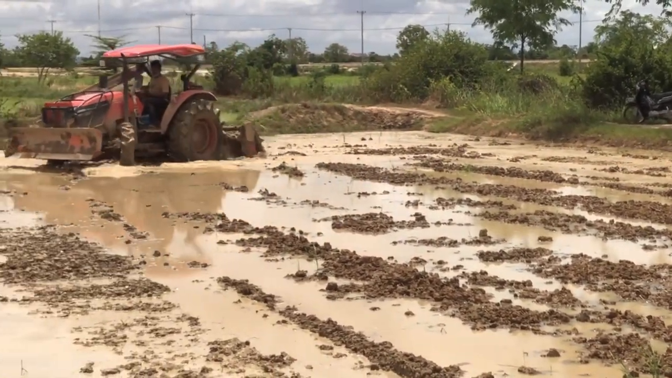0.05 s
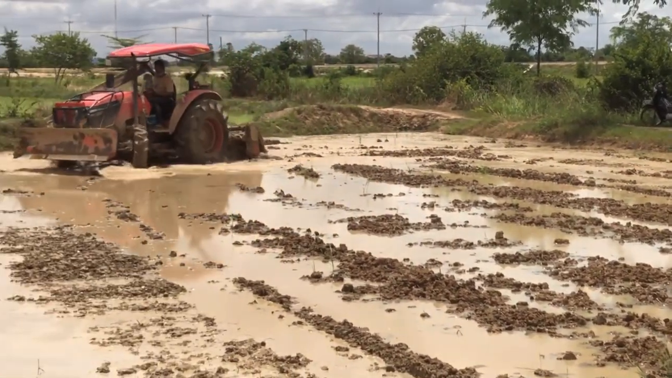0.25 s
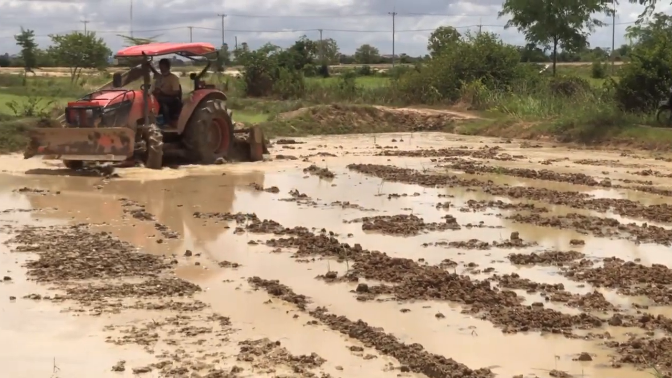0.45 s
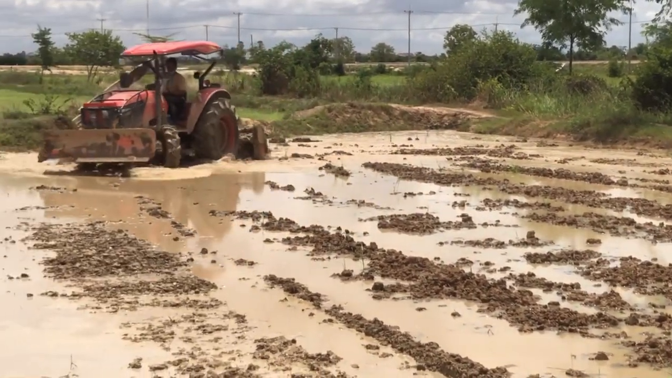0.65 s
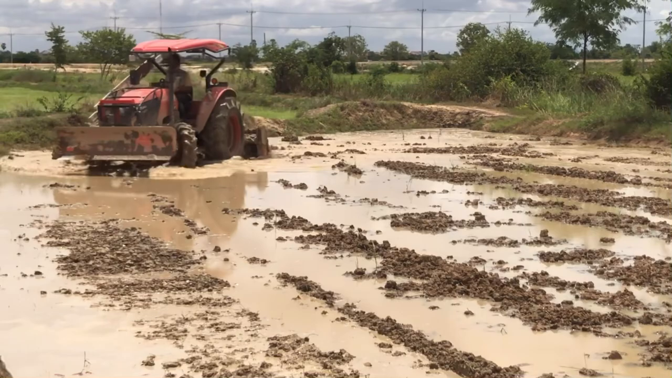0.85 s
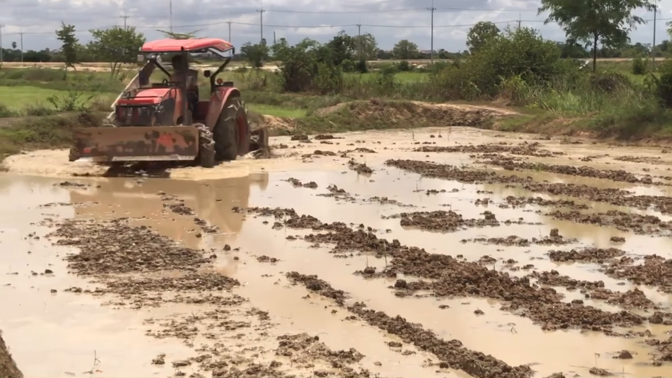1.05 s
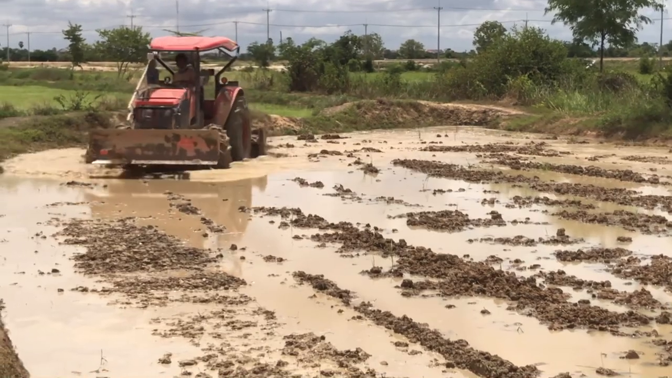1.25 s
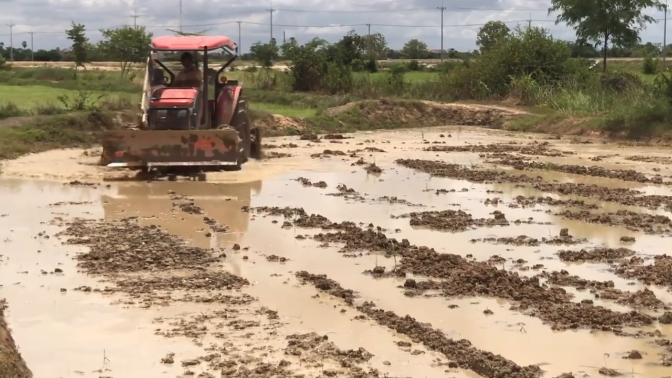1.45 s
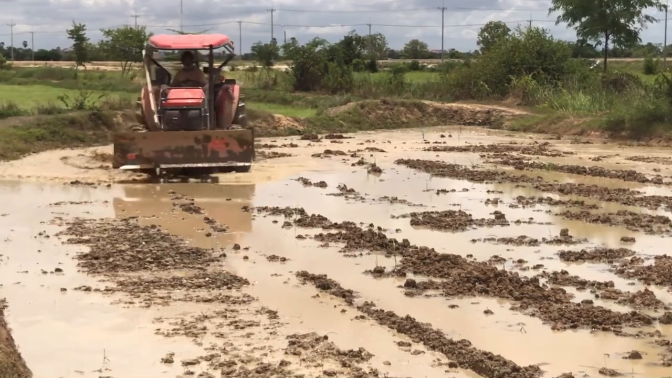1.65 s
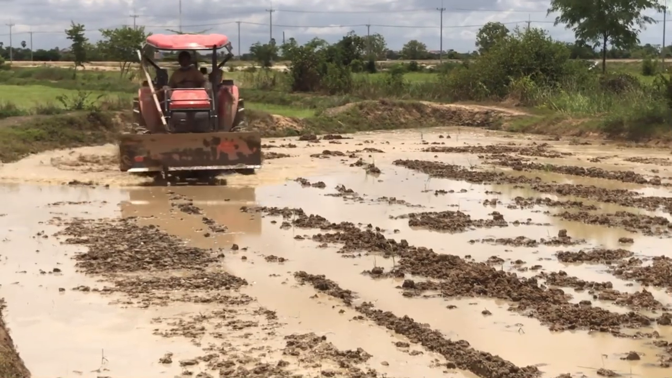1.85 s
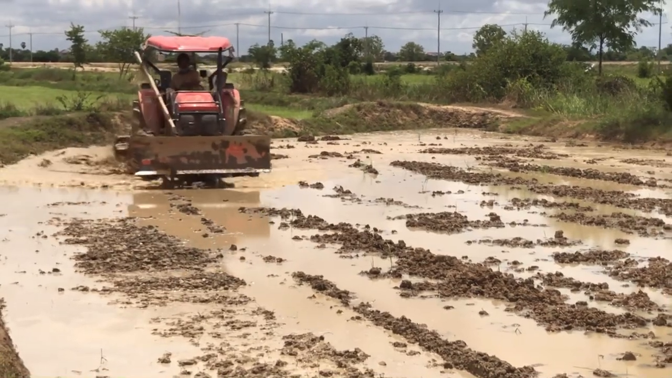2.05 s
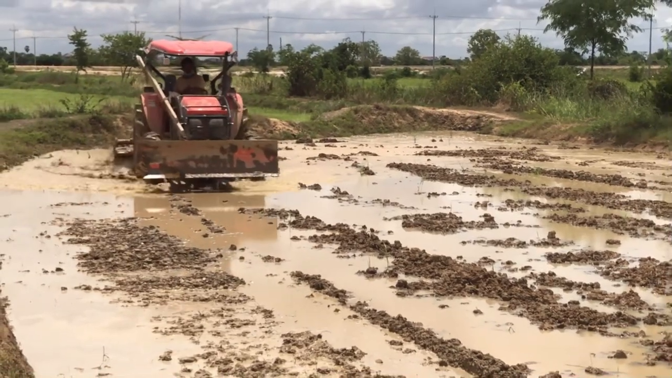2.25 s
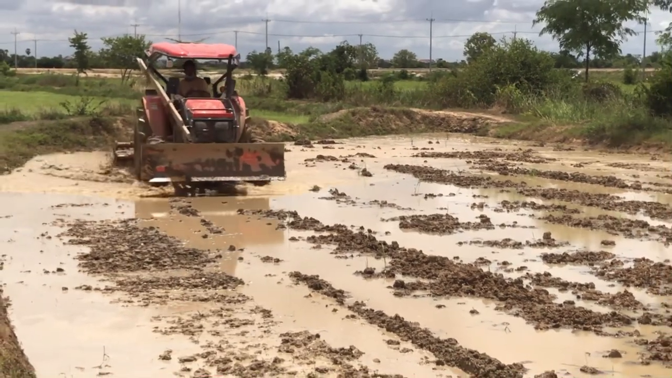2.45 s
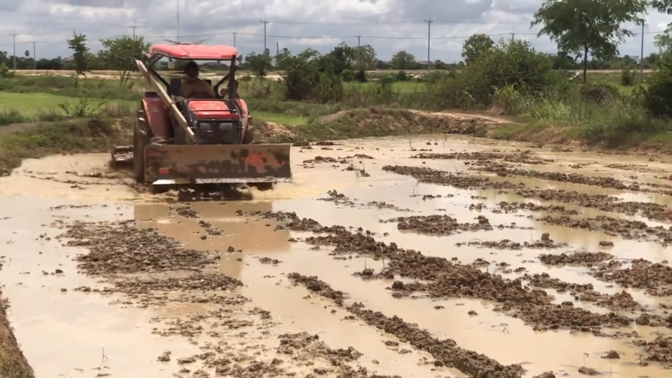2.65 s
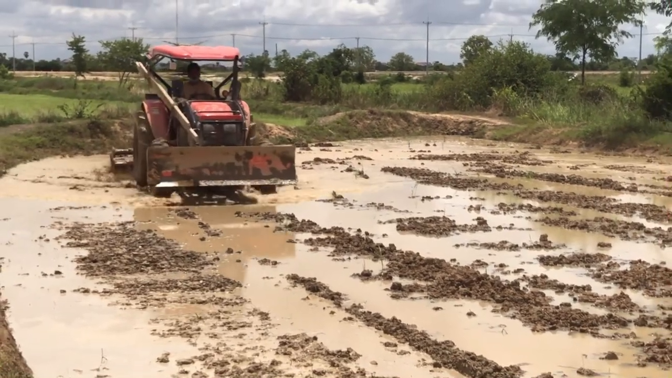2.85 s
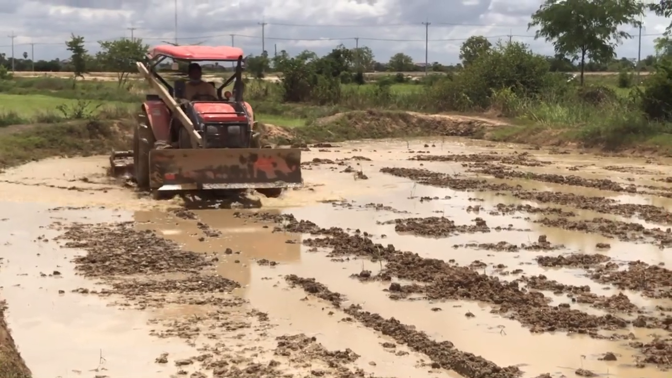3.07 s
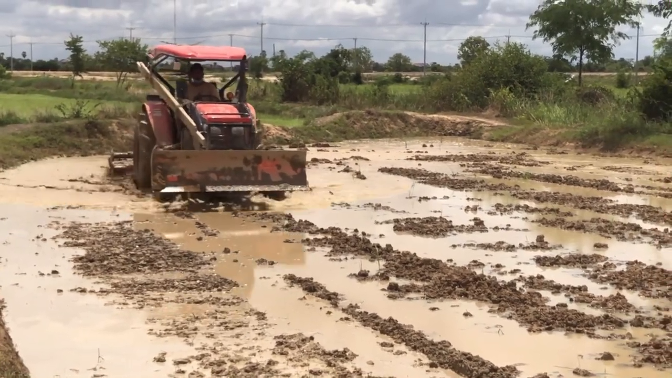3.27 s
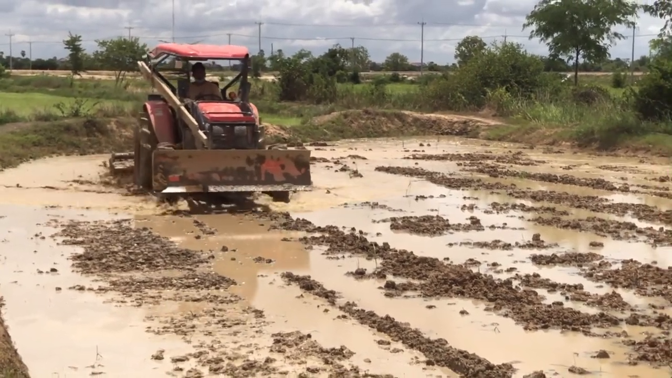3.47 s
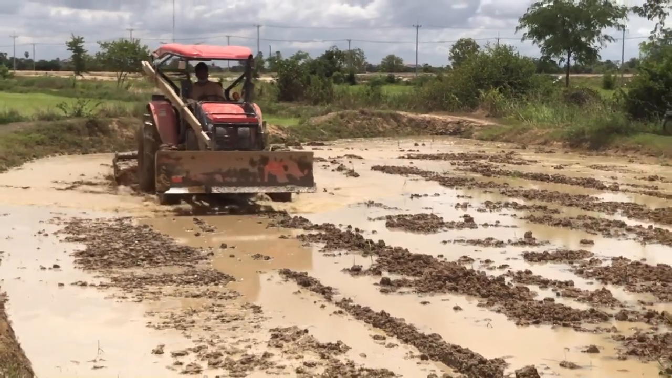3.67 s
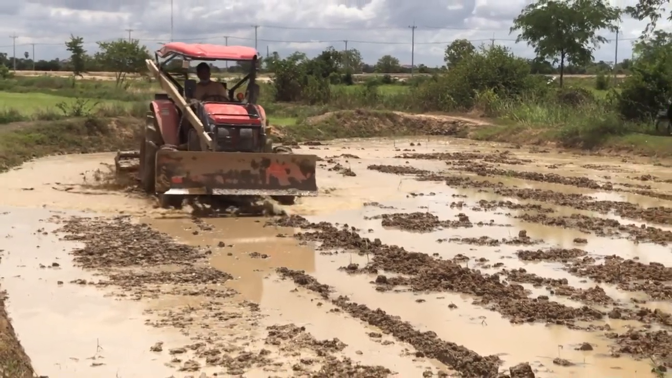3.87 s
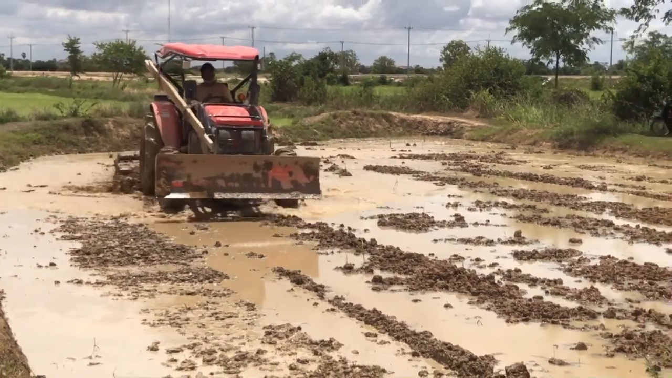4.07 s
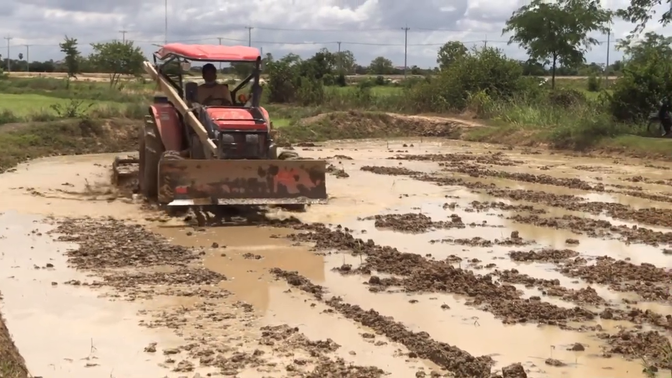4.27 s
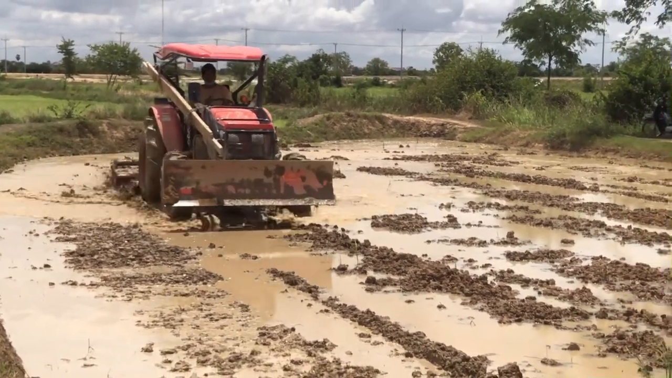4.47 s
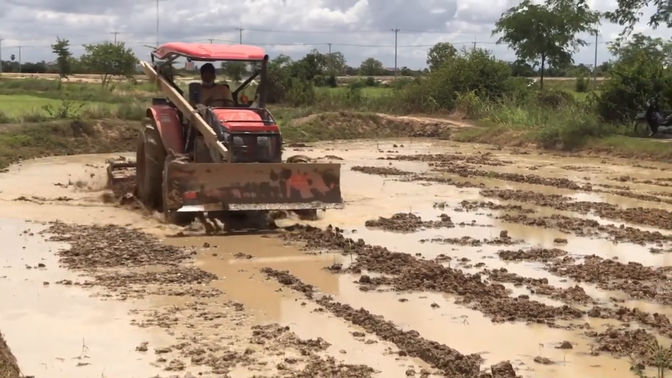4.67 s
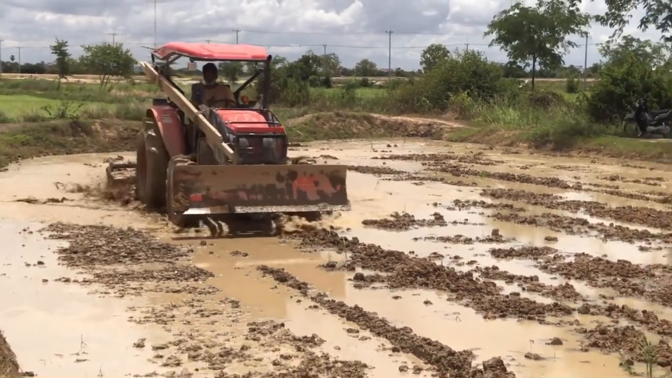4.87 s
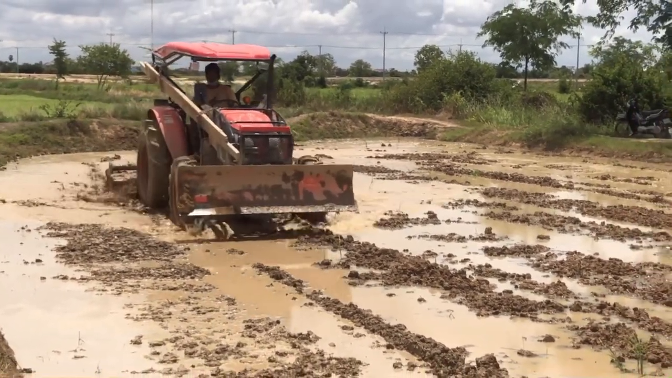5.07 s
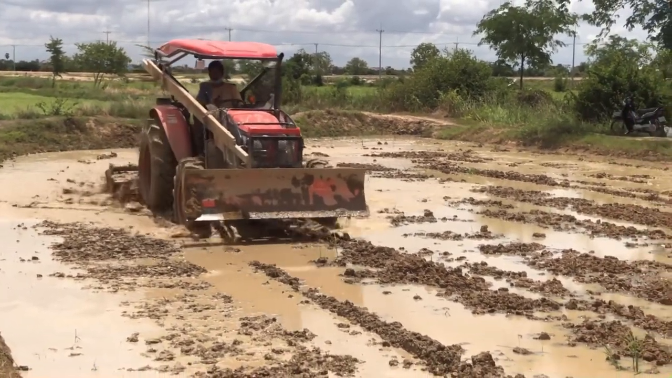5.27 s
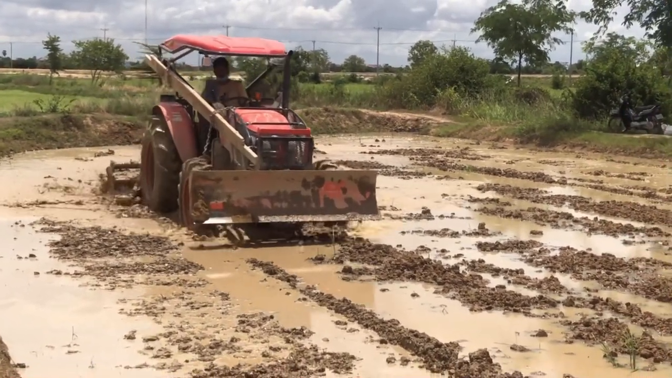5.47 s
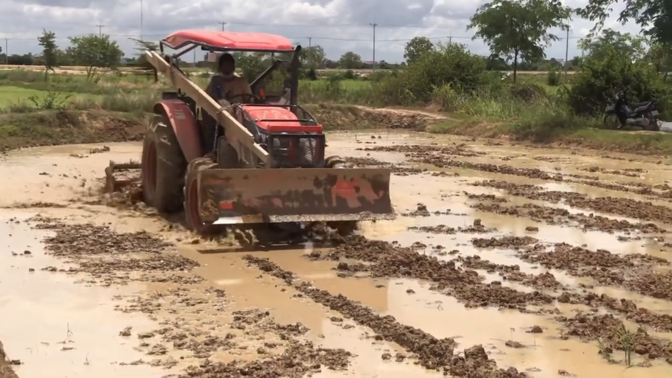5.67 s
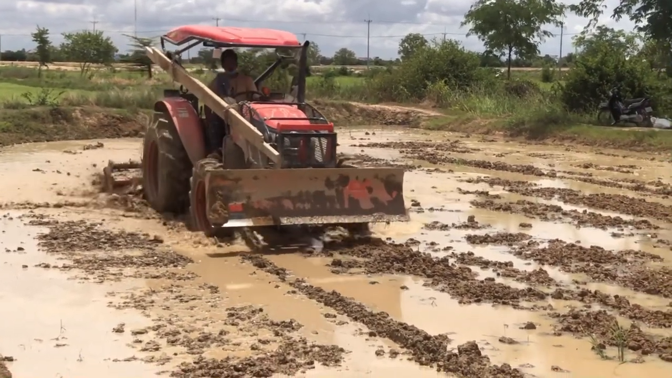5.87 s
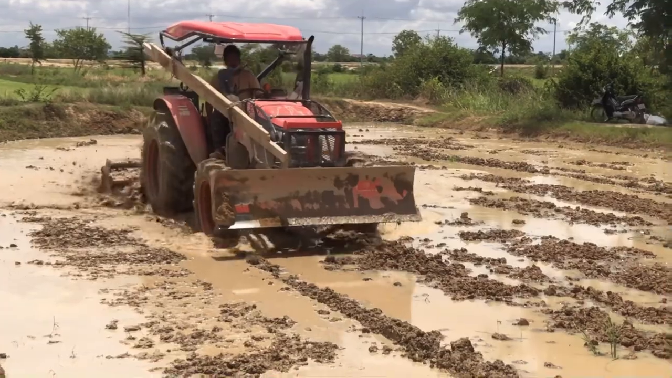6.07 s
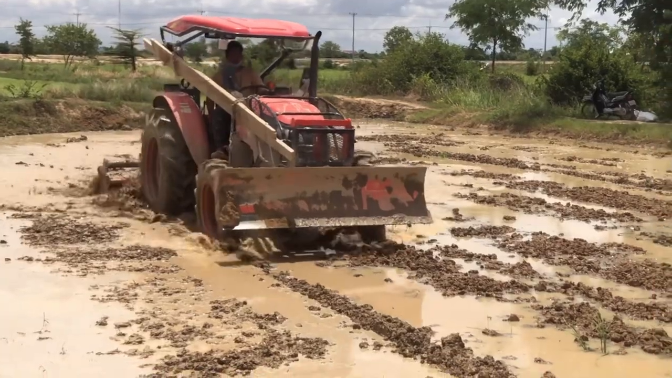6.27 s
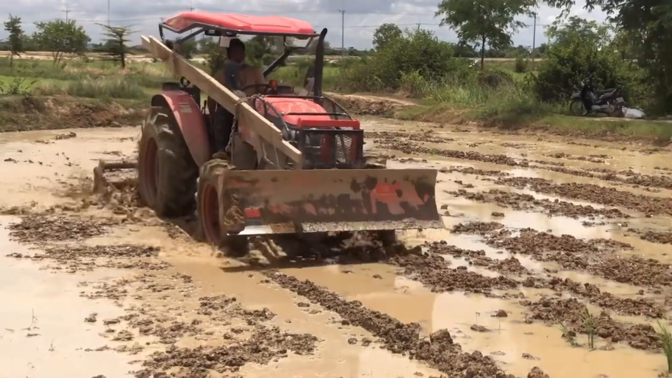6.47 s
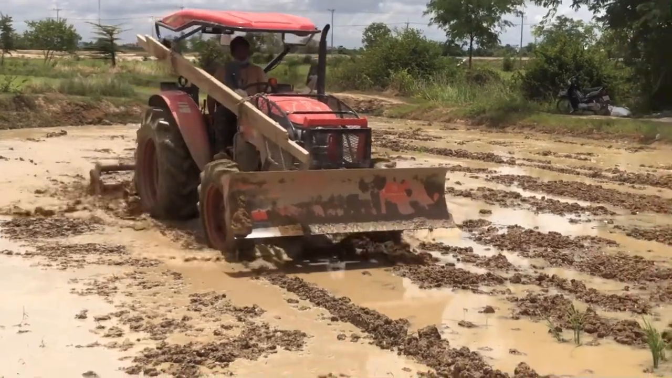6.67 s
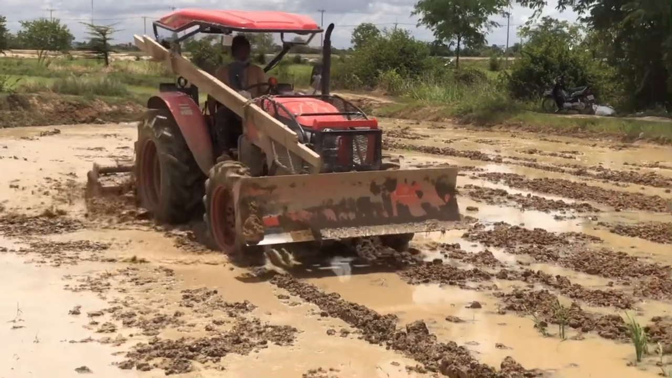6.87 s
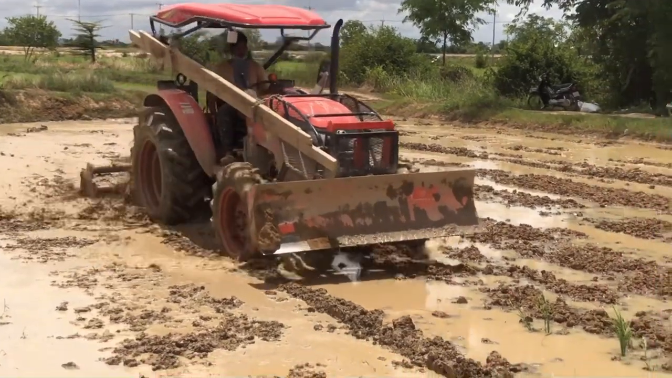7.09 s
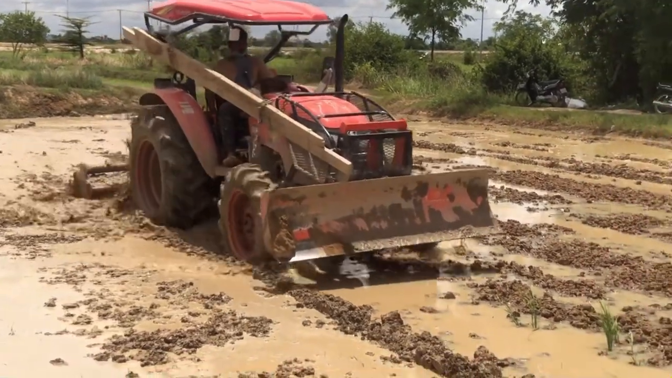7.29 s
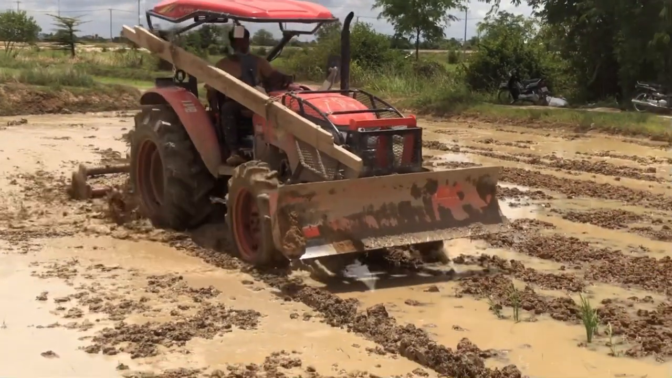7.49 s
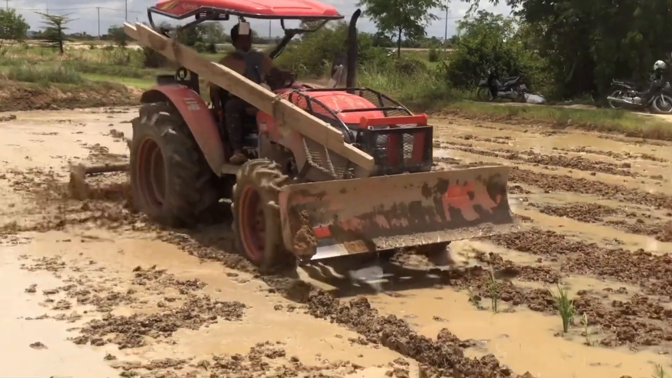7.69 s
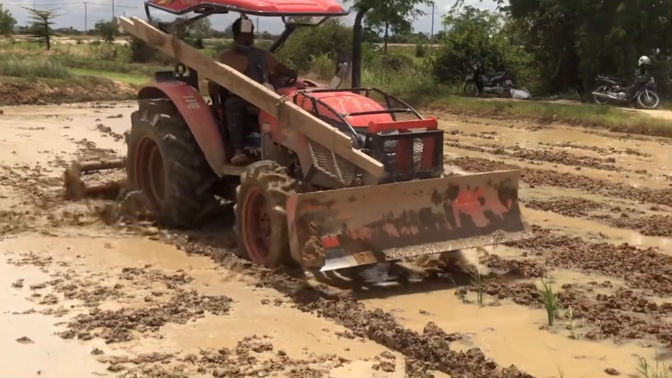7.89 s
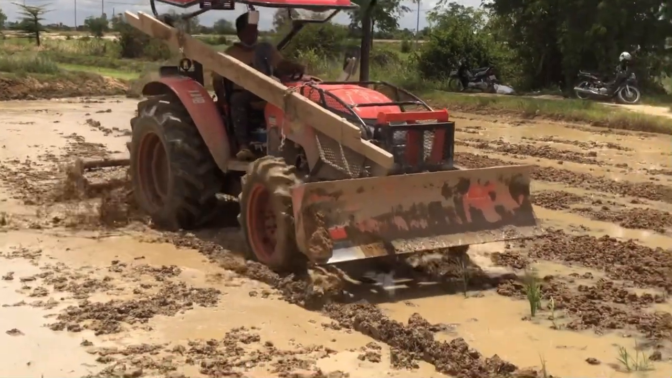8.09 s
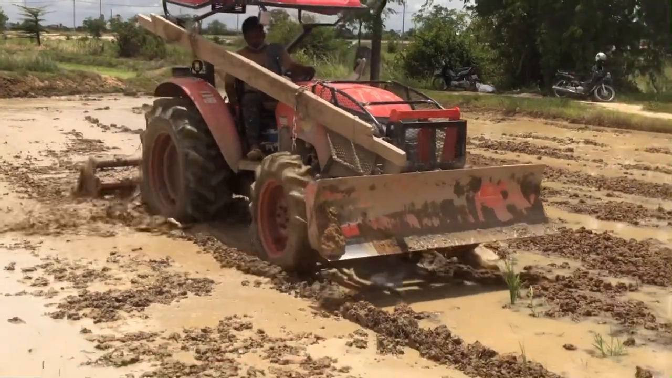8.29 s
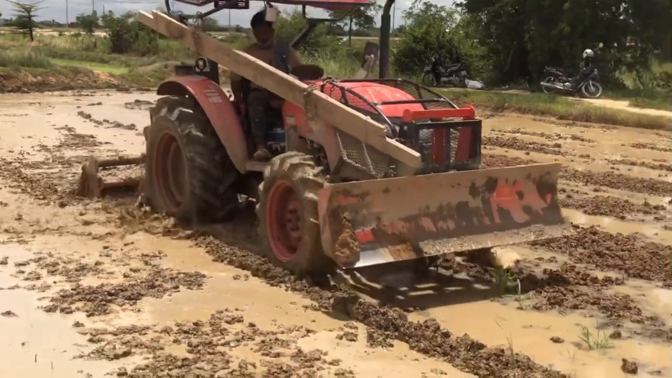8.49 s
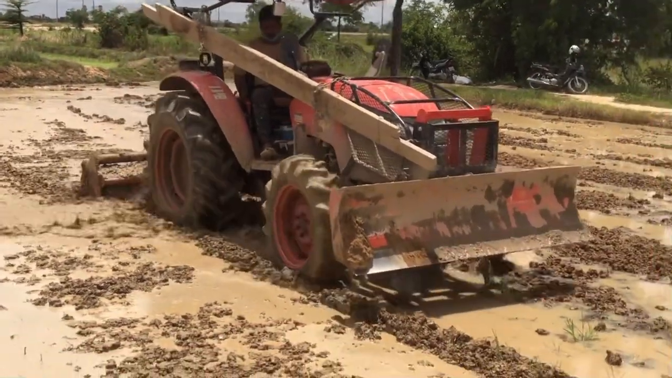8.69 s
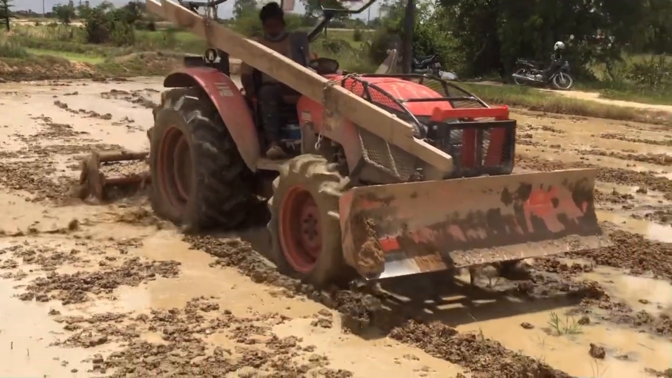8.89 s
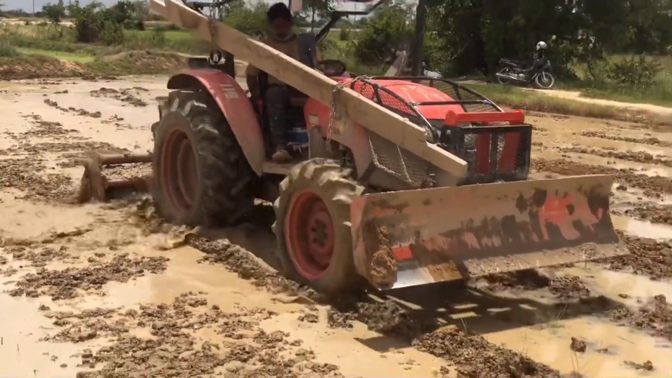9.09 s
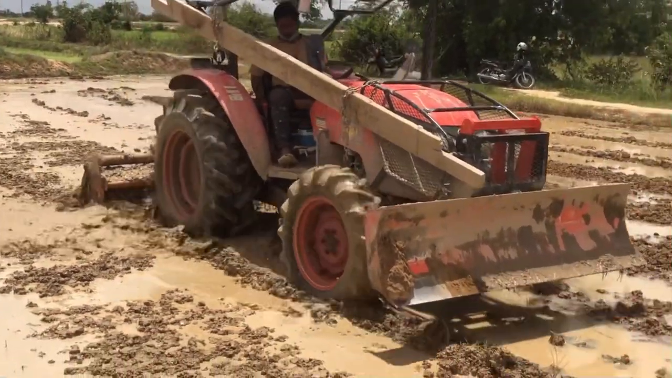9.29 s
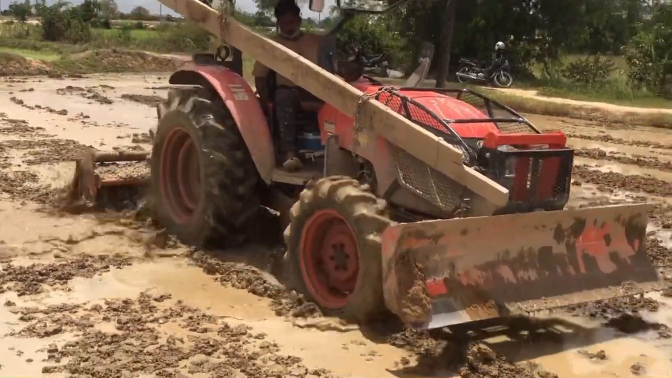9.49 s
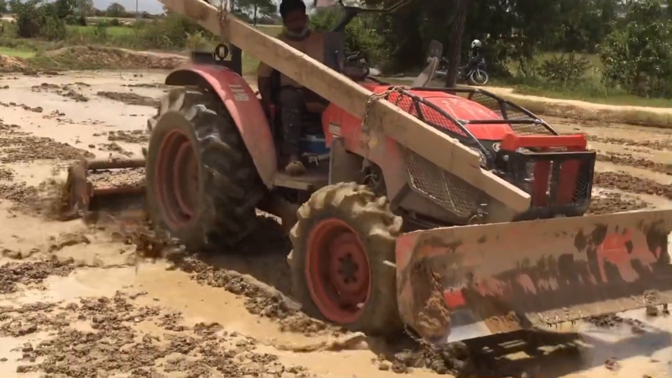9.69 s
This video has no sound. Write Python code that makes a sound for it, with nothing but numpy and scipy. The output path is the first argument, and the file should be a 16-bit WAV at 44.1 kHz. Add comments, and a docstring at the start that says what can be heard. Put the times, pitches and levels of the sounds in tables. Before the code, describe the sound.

Open-air view of a tractor dragging a tiller through mud. A few small ticks and a wind thump open the scene, with a faint whine dying quickly. The diesel's rapid knocking, rough puffs and bright injector ticking then come nearer, tone slowly sweeping with reflections off the water, over a wet splashing wash; close and loudest at the end, labouring lower.

```python
"""A diesel tractor drones and knocks its way nearer through a flooded field, dragging a tiller through mud.
Its speed sags and recovers with the load: one count of firings times the exhaust's harmonics and puffs,
the knocks, rings and ticks of noise through resonant metal, and the gear tones.
The water returns a slowly sweeping echo of block, bonnet, valves and injectors.
Mud splatters as noise shaped by random drops, breeze buffets the microphone, and a few stray ticks stand out."""
import sys
import numpy as np
from scipy import signal
from scipy.fft import rfft, irfft, next_fast_len
from scipy.io import wavfile

SR = 44100
rng = np.random.default_rng(int(sys.argv[2]) if len(sys.argv) > 2 else 0)


def dump(signal):
    """Clip the signal to [-1, 1] and save it as 16-bit WAV at the path in sys.argv[1]."""
    limited = np.clip(np.atleast_2d(signal).T, -1, 1)
    pcm = np.round(limited * 32767).astype(np.int16)
    wavfile.write(sys.argv[1], SR, pcm)


N = 429534
TIME = np.arange(N) / SR  # s

# The cylinders in firing order. Each row: relative strength of knock in dB, of tick and clatter in dB.
CYLINDERS = [(-7.5, -6.5), (-10, -6), (-12.5, -6), (-12.5, -6)]
# The tractor's path. Each row: time in seconds, distance from the microphone in metres.
PATH = [(0, 24.6), (1.5, 20.6), (2.5, 20.8), (3.2, 17.6), (5, 14.1), (6.2, 12.2), (7, 10.3), (8, 8.7),
        (9.74, 6.8)]
# Block knock, before its trim: level in dB at the reference distance, dB gained per dB of nearness,
# dB gained while side-on.
KNOCK_LEVEL = (-36.5, 0.91, 0.1)


def gain_of(db):
    """Decibels to amplitude."""
    return 10 ** (np.asarray(db) / 20)


def evened(x):
    """Scales to rms 1."""
    return x / np.sqrt(np.mean(x ** 2) + 1e-20)


def curves(rows):
    """Each column of a table, after the time column, as a curve over all samples."""
    s, *columns = np.transpose(rows)
    return [np.interp(TIME, s, c) for c in columns]


def swells(rows):
    """Rounded rises or dips of level in dB, from rows of middle (s), length (s) and height (dB)."""
    return sum(db * np.exp(-(2 * (TIME - s) / length) ** 4) for s, length, db in rows)


def wander(per_s):
    """Random drift of rms 1, with `per_s` new values a second joined by straight lines."""
    knots = rng.standard_normal(4000)
    return evened(np.interp(TIME * per_s, np.arange(len(knots)), knots))


def coloured(x, spectrum):
    """Filters x to a spectrum given as rows of Hz and dB; rms 1."""
    size = next_fast_len(N + 4096)
    f, db = np.transpose(spectrum)
    shape_db = np.interp(np.log(np.fft.rfftfreq(size, 1 / SR) + 1), np.log(f + 1), db)
    return evened(irfft(rfft(x, size) * gain_of(shape_db), size)[:N])


def ringing(x, modes):
    """Filters x through resonances, whose amplitude halves one width from the centre; rms 1."""
    size = next_fast_len(N + 4096)
    f = np.fft.rfftfreq(size, 1 / SR)
    power = sum((gain_of(db) / (1 + ((f - hz) / width) ** 2)) ** 2 for hz, width, db in modes)
    return evened(irfft(rfft(x, size) * np.sqrt(power), size)[:N])


def nearness_db():
    """Gain from the tractor's distance, by the inverse distance law."""
    reference_m = 12
    metres, = curves(PATH)
    return 20 * np.log10(reference_m / metres)


def layer_db(level_row, near_db, side_on):
    """A layer's level follows the tractor's distance and its turn."""
    db, growth, side_db = level_row
    return db + growth * near_db + side_db * side_on


def bursts(firings, cylinder_db, scatter_db, rise, decay, between, repeat):
    """A noise burst per firing over a steady floor; the share `repeat` of its power recurs every cycle."""
    at = np.flatnonzero(np.diff(np.floor(firings)) > 0)
    blows = np.zeros(N)
    blows[at] = gain_of(np.resize(cylinder_db, len(at)) + scatter_db * rng.standard_normal(len(at)))
    t = TIME[:2048]
    burst_shape = (1 - np.exp(-t / rise)) * np.exp(-t / decay)  # rise and decay in s
    envelope = evened(signal.oaconvolve(blows, burst_shape)[:N])
    cycle_phase = firings / len(CYLINDERS) % 1
    pattern = evened(np.interp(cycle_phase, np.linspace(0, 1, 2048), rng.standard_normal(2048)))
    share = np.clip(repeat, 0, 1)
    vibration = np.sqrt(share) * pattern + np.sqrt(1 - share) * rng.standard_normal(N)
    return np.hypot(envelope, between) * vibration


def water_echo_ms(height_m):
    """The detour by the water's surface lengthens as the tractor nears."""
    mic_height_m, sound_m_per_s = 2.1, 343
    metres, = curves(PATH)
    return 1000 * 2 * height_m * mic_height_m / metres / sound_m_per_s


def mirrored(x, height_m, water, panels):
    """Adds the water's sweeping echo and drifting echoes off blade and mudguards; rms 1."""
    fine = signal.resample_poly(x, 2, 1)  # doubled rate for smooth fractional delays
    fine_time = np.arange(2 * N) / (2 * SR)

    def delayed(ms):
        return np.interp(TIME - ms / 1000, fine_time, fine)

    water_echo = delayed(water_echo_ms(height_m))
    panel_ms = [ms + .06 * wander(1.2) for ms in np.geomspace(.6, 3.4, 5)]
    # every second panel echo is inverted
    panel_echoes = sum((-1) ** k * delayed(ms) for k, ms in enumerate(panel_ms))
    return evened(x + water * water_echo + panels * panel_echoes)


def breeze():
    """Air buffets the microphone: low noise with a wandering level and a few stronger gusts."""
    # Each row: frequency in Hz, relative level in dB.
    gust_spectrum = [(10, -14), (28, -15), (50, 6), (75, 8), (130, 13.5), (300, -16), (1000, -68)]
    # Each row: middle in seconds, length in seconds, rise over the calm in dB.
    gust_swells = [(.45, .3, 12), (4.95, .25, 7), (5.88, 0.22, 12), (6.46, 0.2, 13)]
    calm_db, rise_db_per_s, wander_db = -52, 0.05, 2
    db = calm_db + rise_db_per_s * TIME + wander_db * wander(11) + swells(gust_swells)
    return gain_of(db) * coloured(rng.standard_normal(N), gust_spectrum)


def stray_ticks():
    """Ticks and dull knocks: sudden, decaying bursts of noise, each ringing in one band."""
    # Each row: start in seconds, peak level in dB, centre in Hz, width in Hz, decay in seconds.
    tick_rows = [(.2495, -36, 2500, 1350, .0018), (.251, -34, 400, 420, .006), (.396, -33, 200, 150, .006),
                 (.433, -34, 400, 300, .012), (.552, -35, 500, 450, .008), (8.475, -43, 13000, 350, .008)]
    out = np.zeros(N)
    for s, db, hz, width, decay in tick_rows:
        envelope = (TIME >= s) * np.exp(-np.minimum(abs(TIME - s) / decay, 50))
        band = ringing(envelope * rng.standard_normal(N), [(hz, width, 0)])
        # the band has rms 1 over the whole scene, so the envelope's rms restores its peak
        out += gain_of(db) * np.sqrt(np.mean(envelope ** 2)) * band
    return out


def splashing(near_db, side_on):
    """Muddy drops, a few of them large, fall back into a soft wash of churned water."""
    # Each row: frequency in Hz, relative level in dB.
    spray_spectrum = [(200, -23), (600, 18), (1800, 13.5), (3000, 4.5), (6500, 0), (9500, 3), (12500, 2.5),
                      (15500, 0.5)]
    # Level in dB at the reference distance before trim, dB per dB of nearness, dB gained while side-on.
    splash_level = (-55, 1.45, -1.3)
    # The water surges, then slackens. Each row: middle in seconds, length in seconds, change in dB.
    surge_swells = [(.95, 0.25, 2.5), (2.0, 0.9, -4)]
    drops_per_s, drop_decay_s = 620, 0.0003
    sizes = gain_of(4.8 * np.minimum(rng.exponential(1, N), 4.8))
    drops = sizes * (rng.random(N) < drops_per_s / SR)
    drop_power = signal.oaconvolve(drops ** 2, np.exp(-TIME[:512] / drop_decay_s))[:N]
    spatter = np.sqrt(abs(drop_power))
    water = np.hypot(0.6 * evened(spatter), 1) * rng.standard_normal(N)  # the 1 is the steady wash
    db = layer_db(splash_level, near_db, side_on) + swells(surge_swells) + .5 * wander(14)
    return gain_of(db + 6.0) * coloured(water, spray_spectrum)


def gears(firings, near_db, side_on):
    """Thin wavering sines locked to the engine's speed: a fading whine, a hum and gear tones."""
    # Each row: multiple of the firing rate, level in dB against the untrimmed knock.
    gear_tones = [(3.5, -13), (9.5, -16.5), (12.67, -15.5), (13.5, -12.5)]
    whine_order, whine_db, whine_fade_s = 13.6, -39, 0.1  # orders are multiples of the firing rate
    hum_order, hum_db, hum_wander_db = 4.75, -55, 3.5

    def tone(order, db):
        phase = 2 * np.pi * order * firings + .5 * wander(30)
        return np.sqrt(2) * gain_of(db + 2 * wander(13)) * np.sin(phase)

    # the driveline's whine falls to half after one fade time
    whine = tone(whine_order, whine_db) / (1 + TIME / whine_fade_s)
    hum = tone(hum_order, hum_db + hum_wander_db * wander(2.08))
    knock_db = layer_db(KNOCK_LEVEL, near_db, side_on)
    return whine + hum + sum(tone(order, knock_db + db) for order, db in gear_tones)


def injectors(firings, near_db, side_on):
    """Short bright ticks of uneven strength ring high resonances at each firing."""
    # Each row: centre in Hz, width in Hz, level in dB.
    injector_modes = [(7060, 200, -2), (7665, 400, 3.5), (8600, 330, -2.5), (9940, 350, -1.5),
                      (10870, 610, 2.5), (12500, 900, -6)]
    # Level in dB at the reference distance before trim, dB per dB of nearness, dB gained while side-on.
    injection_level = (-53.5, 0.96, -6)
    blows = bursts(firings, np.transpose(CYLINDERS)[1], scatter_db=3.0, rise=0.00093, decay=0.0023,
                   between=0.49, repeat=0.031)
    heard = mirrored(ringing(blows, injector_modes), height_m=1.3, water=0.93, panels=0.4)
    db = layer_db(injection_level, near_db, side_on) + 1.2 * wander(5)
    return gain_of(db - 2.5) * heard


def clatter(firings, near_db, side_on):
    """The valve cover rings with each firing, and swells now and then."""
    # Each row: centre in Hz, width in Hz, level in dB.
    cover_modes = [(2315, 40, 2.5), (3060, 133, 0.5), (3320, 310, -5), (4145, 276, 3.5), (4576, 220, 3),
                   (5330, 710, -9.5)]
    # Level in dB at the reference distance before trim, dB per dB of nearness, dB gained while side-on.
    clatter_level = (-50.5, 0.65, -2.6)
    # Each row: middle in seconds, length in seconds, rise in dB.
    clatter_swells = [(1.05, 0.34, 3.5), (4.45, .8, 2), (6.7, .3, 2)]
    blows = bursts(firings, np.transpose(CYLINDERS)[1], scatter_db=2.5, rise=0.0052, decay=0.0031,
                   between=0.98, repeat=0.18)
    heard = mirrored(ringing(blows, cover_modes), height_m=1.29, water=.55, panels=0.2)
    db = layer_db(clatter_level, near_db, side_on) + swells(clatter_swells)
    return gain_of(db + 0.84) * heard


def bonnet(firings, near_db, side_on):
    """A sheet-metal panel rings after each knock; the water echo sweeps through its resonances."""
    # Each row: centre in Hz, width in Hz, level in dB.
    bonnet_modes = [(1122, 51, 1), (1343, 68, -0.5), (1491, 81, 4)]
    # Level in dB at the reference distance, dB gained per dB of nearness, dB gained while side-on.
    bonnet_level = (-42.5, 1.0, -2.5)
    # Each row: middle in seconds, length in seconds, rise in dB.
    bonnet_swells = [(3.1, 1.5, 5.5), (6.0, 1.3, 2), (8.25, 0.96, 2.5)]
    blows = bursts(firings - 1 / 8, np.transpose(CYLINDERS)[0], scatter_db=2, rise=0.001, decay=0.0049,
                   between=0.46, repeat=0.15)
    heard = mirrored(ringing(blows, bonnet_modes), height_m=1.36, water=0.77, panels=0.018)
    return gain_of(layer_db(bonnet_level, near_db, side_on) + swells(bonnet_swells)) * heard


def knock(firings, near_db, side_on):
    """Combustion strikes the engine block, which adds two sharp resonances to its broad body."""
    # Each row: frequency in Hz, relative level in dB.
    block_spectrum = [(400, -29), (620, -11), (700, -4), (900, 1), (1080, 2), (1250, -4.5), (1350, 0),
                      (1520, -6.5), (1620, -15.5), (1780, -13.5), (2100, -17.5), (2500, -27), (4000, -35.5)]
    # The sharpest resonances. Each row: centre in Hz, width in Hz, level in dB.
    block_modes = [(1087, 18, -5), (1226, 20, 3)]
    blows = bursts(firings - 1 / 8, np.transpose(CYLINDERS)[0], scatter_db=1.4, rise=0.0011, decay=0.024,
                   between=0.49, repeat=0.32)
    body = coloured(blows, block_spectrum) + gain_of(-9) * ringing(blows, block_modes)
    heard = mirrored(body, height_m=1.42, water=0.13, panels=0.0077)
    return gain_of(layer_db(KNOCK_LEVEL, near_db, side_on) - 2.22) * heard


def puffs(firings, near_db, side_on):
    """Gas leaves the exhaust pipe in a rough puff after each firing."""
    # Each row: frequency in Hz, relative level in dB.
    pipe_spectrum = [(30, -36), (60, -6), (110, -0.5), (200, 3.5), (300, -1), (420, -1.5), (500, -4),
                     (560, -2.5), (620, -17.5), (800, -9), (1500, -39.5)]
    # Level in dB at the reference distance before trim, dB per dB of nearness, dB gained while side-on.
    puff_level = (-41.5, 1.16, 2.4)
    gas = bursts(firings - 1 / 8, [0], scatter_db=1.1, rise=.002, decay=.0055, between=.6, repeat=.15)
    return gain_of(layer_db(puff_level, near_db, side_on) + 4.0) * coloured(gas, pipe_spectrum)


def drone(firings, firing_hz, near_db, side_on):
    """The exhaust's low note: harmonics of the firing rate, rebalanced as the governor cuts the fuel."""
    # Each row: multiple of the firing rate, level in dB, dB per dB of nearness, dB gained while side-on,
    # dB lost per firing a second above the governed speed.
    harmonics = [(1, -33.5, 0.98, 0.2, -0.22), (2, -30, 0.36, -2.5, 0.97), (3, -48.5, .5, 5.5, .1),
                 (4, -58.5, -0.5, -3, -0.8), (5, -56, 1.4, 8, 0), (6, -59, 2.2, 3, -1.2)]
    # The silencer booms when a harmonic meets a resonance. Each row: centre in Hz, width in Hz, rise in dB.
    booms = [(222, 20.4, 12), (437, 21, 4.5)]
    # Each row: middle in seconds, length in seconds, change in dB.
    note_swells = [(.7, 0.9, -10), (2.3, 0.48, -1.5), (4.1, 1.1, 1.5), (6.9, 0.97, 1)]
    governed_hz = 86.14  # firings a second
    eased_hz = np.maximum(firing_hz - governed_hz, 0)
    note = np.zeros(N)
    for k, db, growth, side_db, loss_db in harmonics:
        boom_db = sum(peak * np.exp(-((k * firing_hz - hz) / width) ** 2) for hz, width, peak in booms)
        swing = np.cos(2 * np.pi * k * (firings - 1 / 7) + .6 * np.pi)
        moving_db = layer_db((db, growth, side_db), near_db, side_on)
        note += gain_of(moving_db - loss_db * eased_hz + boom_db) * swing
    flutter_db = .2 * wander(40) + .35 * wander(6)
    return np.sqrt(2) * gain_of(swells(note_swells) + flutter_db) * note


def scene():
    """One count of firings drives every engine layer; most layers grow louder as the tractor nears."""
    # Engine speed, sagging as the tiller bites. Each row: time in seconds, firings a second.
    speed = [(0.0, 76.0), (0.24, 79.7), (0.52, 88.2), (0.9, 85.9), (1.05, 89.1), (1.34, 81.3), (1.55, 84.7),
             (2.12, 89.9), (2.8, 89.5), (3.49, 86.3), (3.85, 81.8), (5.02, 88.3), (5.13, 90.2),
             (5.54, 89.1), (5.72, 91.4), (6.42, 92.6), (6.62, 87.8), (7.13, 80.3), (7.56, 78.8),
             (7.86, 74.7), (8.26, 80.7), (8.57, 73.4), (8.9, 72.1), (9.49, 76.4), (9.74, 83.8)]
    firing_hz, = curves(speed)
    firings = np.cumsum(firing_hz * (1 + 0.001992 * wander(30))) / SR
    # the tractor swings round from side-on (1) to face the microphone (0)
    facing_s, facing_takes_s = 2.79, 0.96
    side_on = np.clip(.5 + (facing_s - TIME) / facing_takes_s, 0, 1)
    near_db = nearness_db()
    mix = breeze() + stray_ticks() + splashing(near_db, side_on)
    for layer in (gears, injectors, clatter, bonnet, knock, puffs):
        mix = mix + layer(firings, near_db, side_on)
    mix = mix + drone(firings, firing_hz, near_db, side_on)
    return mix[None]


def record(dry):
    """The recorder's band limit: a steep low-pass."""
    edge_hz = 15720
    lowpass = signal.firwin(1023, edge_hz, window=("kaiser", 9), fs=SR)
    return signal.oaconvolve(dry, lowpass[None], "same")


dry = scene()
out = record(dry)
dump(out)
```